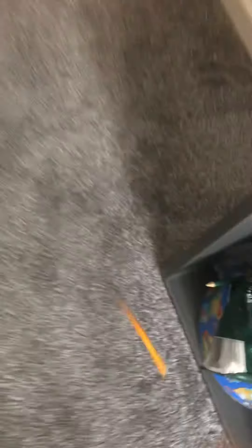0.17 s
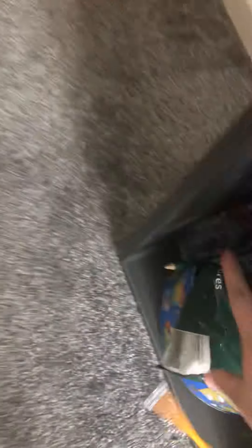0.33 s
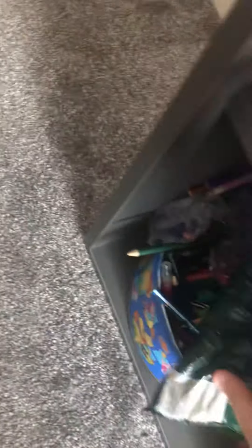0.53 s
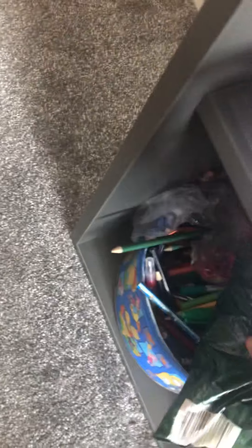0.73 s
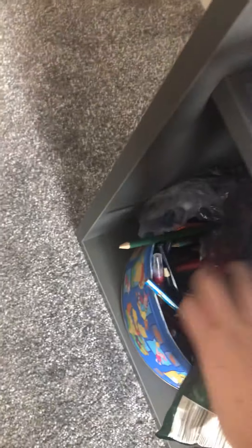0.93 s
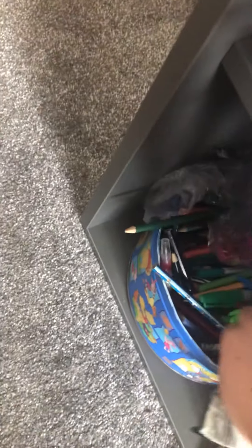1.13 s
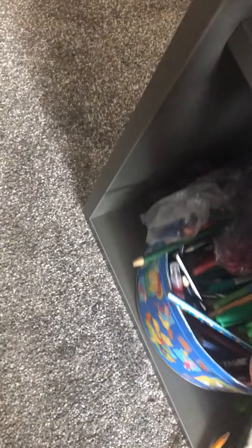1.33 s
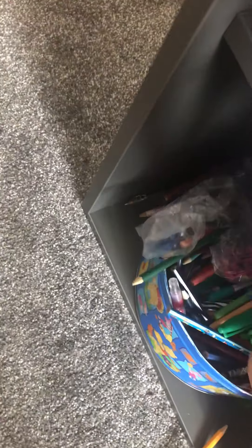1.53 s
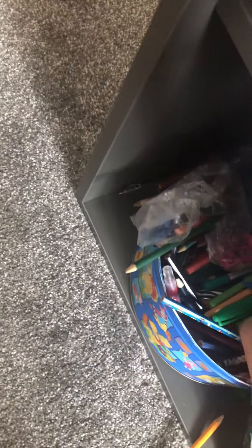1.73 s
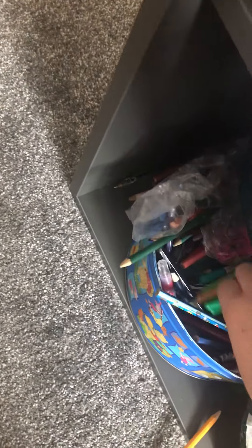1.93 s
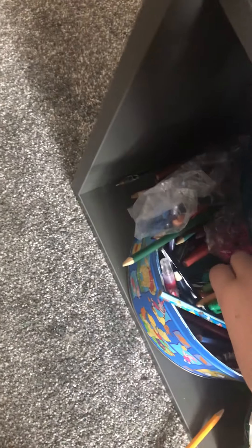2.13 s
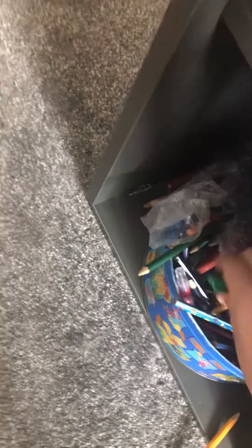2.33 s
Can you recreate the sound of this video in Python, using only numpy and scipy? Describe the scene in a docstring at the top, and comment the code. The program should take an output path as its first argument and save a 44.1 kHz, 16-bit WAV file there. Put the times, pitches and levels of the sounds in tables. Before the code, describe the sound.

Pens and pencils rattle sharply as a hand rummages through a tin inside a cabinet; a soft thud comes first, then loud clicks, taps and plastic bag rustle, thinning to faint ticks, close to a phone microphone.

```python
"""Sharp clicks of pens and pencils rummaged through by hand in a tin, inside an open cabinet, close to a phone.
Impacts excite decaying modes and noise bursts; taps are brief sines; a plastic bag rustles as gated noise.
Bumps ring the cabinet panels and the tin bottom, and a landing thuds on the carpeted floor.
Low rumbles and a faint room tone are shaped noise; the cabinet adds a short diffuse echo."""
import sys
import numpy as np
from scipy import signal
from scipy.fft import rfft, irfft, next_fast_len
from scipy.io import wavfile
from scipy.ndimage import map_coordinates

SR = 44100
rng = np.random.default_rng(int(sys.argv[2]) if len(sys.argv) > 2 else 0)


def store_pcm(level_fs):
    """Save levels as 16-bit WAV."""
    pcm = np.round(np.clip(level_fs, -1, 1) * 32767).astype(np.int16)
    wavfile.write(sys.argv[1], SR, np.atleast_2d(pcm).T)


def gain_from_db(level_db):
    """Turn a decibel level (scalar or array-like) into a linear amplitude factor."""
    decades = np.asarray(level_db, float) / 20
    return 10 ** decades


N = 109897  # samples


def unit(x):
    """Normalisation: scales a signal to rms 1."""
    return x / np.sqrt(np.mean(x ** 2) + 1e-20)


def along(points, hz):
    """Logarithmic pitch axis: reads (Hz, value) points between their frequencies."""
    point_hz, value = np.transpose(points)
    return np.interp(np.log(hz + 1), np.log(point_hz + 1), value)


def curves(rows):
    """Linear envelopes: one value per sample for each column after the time."""
    start_s, *columns = np.transpose(rows)
    return [np.interp(np.arange(N) / SR, start_s, column) for column in columns]


def wobble(rate):
    """Slow random modulation: a smooth curve through `rate` random knots a second."""
    knots = rng.standard_normal(int(N * rate / SR) + 4)
    return map_coordinates(knots, [np.arange(N) * rate / SR])


def coloured(x, points, tilt_db=0):
    """Linear filtering: x through a spectrum in dB, tilted by tilt_db per octave about 3 kHz."""
    size = next_fast_len(N + 8192)
    hz = np.fft.rfftfreq(size, 1 / SR)
    gain_db = along(points, hz) + tilt_db * np.log2((hz + 50) / 3000)
    return irfft(rfft(x, size) * gain_from_db(gain_db), size)[:N]


def bandpass(x, low_hz, high_hz, order=3):
    """Band limiting: a Butterworth filter passes low_hz to high_hz."""
    return signal.sosfilt(signal.butter(order, [low_hz, high_hz], "band", fs=SR, output="sos"), x)


def placed(times, shapes):
    """Superposition: the sum of one short shape per start time."""
    at = np.round(times * SR).astype(int)[:, None] + np.arange(shapes.shape[1])
    return np.bincount(at.ravel(), shapes.ravel(), N + SR)[:N]


def ringing(modes, level_db, attack_s, spread_db):
    """Modal decay: each blow is a row of dying sines, each mode randomly stronger or weaker."""
    t = np.arange(SR // 3) / SR
    draw = rng.standard_normal((len(level_db), len(modes)))
    ring = 0
    for k, (hz, mode_db, t60) in enumerate(modes):
        start_db = level_db[:, None] + mode_db + spread_db * draw[:, [k]]
        ring = ring + gain_from_db(start_db - 60 * t / t60) * np.sin(2 * np.pi * hz * t)
    return ring * (1 - np.exp(-t / attack_s))


RISE_S = 0.0006  # delay of each click after its start_s
DULL, MIDDLE, BRIGHT = (499, 3050, 0.055), (1910, 7180, 0.023), (7460, 15400, 0.016)  # low_hz, high_hz, t60_s
BAND_TRIM_DB = (2.5, -1.5, 5)  # dull, middle, bright
SNAP = 1.26  # contact spike, against noise of rms 1
CRACK_DB, CRACK_T60_S = 1, 0.0018  # fast decay added to each band's slow one
RING_DB, RING_T60_S = -5.5, 0.023
# Pen clicks: start_s, level_db, dull_db and bright_db (both relative to level_db), ring_hz
PEN_CLICKS = [(0.2408, -36, -11, -10, 2680), (0.288, -2.5, -16.5, -4.5, 1840), (0.3542, -22, -19, -8, 1900),
              (0.3655, -11, -5, -5.5, 4080), (0.374, -15.5, -15, -1, 4450), (0.3802, -20, -15, -2, 1840),
              (0.408, -22, -17, -13, 3480), (0.429, -17.5, -3.5, -7, 2730), (0.4385, -17, -7, -5.5, 2530),
              (0.4536, -23, -14, -4, 1840), (0.478, -21.5, -18, -1, 5700), (0.5427, -20.5, -4, -7, 1600),
              (0.5784, -21, -2, 2.5, 2770), (0.6519, -23, -20, 0, 4430), (0.6574, -10.5, -17, 2.5, 5810),
              (0.6676, -19, -3, -1, 8800), (0.6888, -14, -2.5, -24, 1880), (0.8088, -14.5, 2.5, -28, 4120),
              (0.842, -10.5, -9, -14, 4460), (0.8465, -23.5, 4, -26, 2800), (0.8686, -28.5, 6, -7, 1970),
              (0.889, -38.5, 5.5, 9.5, 11800), (0.9097, -22, 2, -9.5, 1900), (0.9515, -23, -3.5, -17, 1630),
              (1.0147, -13.5, -10, -2.5, 4000), (1.0181, -14.5, -11, -5, 5800),
              (1.0645, -20, -28, -10, 2260), (1.0969, -24, -4.5, -0.5, 5260), (1.1518, -27, -20, 0, 1630),
              (1.1865, -24.5, -10, -2, 3800), (1.2705, -31, -3, -2, 1530), (1.3274, -21.5, -16, -4, 7200),
              (1.3366, -22.5, -11, -2, 9500), (1.3524, -9.5, -16.5, -10, 4450), (1.3653, -25, -5, 6, 11400),
              (1.3795, -16.5, -27, 10.5, 11700), (1.388, -27, -5.5, -1, 11800),
              (1.4015, -17.5, -23, 5.5, 11200), (1.4074, -9.5, -26, 5, 11900),
              (1.4102, -9, -16.5, -3, 7760), (1.4136, -14, -15.5, -20, 7990), (1.425, -13, -25, -12, 4030),
              (1.4357, -22, -16, -12, 4350), (1.442, -18.5, -29, 5, 11600), (1.4519, -22, -23, 1.5, 11400),
              (1.4563, -15.5, -11, -5, 4100), (1.459, -15.5, -37, 0.5, 4430), (1.487, -34, -16, 9, 11400),
              (1.5, -29, -22, -1, 6150), (1.5067, -19.5, -30, -17, 4230), (1.511, -15.5, -19, -1, 3560),
              (1.5318, -41, -10, 9, 7900), (1.538, -16.5, -21, -0.5, 7900),
              (1.5518, -14.5, -15.5, -8, 2550), (1.5573, -14, -14.5, -13, 3440),
              (1.565, -25, -18, -8, 4900), (1.6116, -23, -34, -2, 4560), (1.6159, -15.5, -16.5, -9, 3530),
              (1.6454, -18.5, -14, -10.5, 3970), (1.6482, -23, -11, -21, 3083), (1.723, -35, -13, -2, 9400),
              (1.7345, -34, -9, -9, 2150), (1.7626, -35, -1.5, -11, 1550), (1.7748, -39, -15, -2, 7200),
              (1.7837, -32, -12, -9, 4060), (1.8078, -28.5, -13.5, -9, 2080), (1.8475, -35, -5, -25, 2430),
              (1.8878, -38, -2.5, -10, 2110), (1.9055, -30, -10.5, -13, 3970), (1.9275, -37, -7, -9, 3050),
              (1.9578, -28.5, -11, -8, 6000), (1.9947, -38, -3, -6, 1530), (2.0376, -36, -3.5, -22, 1820),
              (2.102, -37.5, -4, -7, 3550), (2.1862, -35.5, -3, -7, 2780), (2.1936, -28.5, -7, -0.5, 8300),
              (2.2076, -32.5, -8, -3, 5440), (2.2252, -28, -13, -12, 2130), (2.271, -31, -6, -10, 5950),
              (2.3, -34, -21, -5, 4510), (2.3123, -26, -21, -3.5, 1590), (2.3644, -35, -1, -1, 1840),
              (2.4318, -24.5, -9.5, -13, 4570), (2.4378, -33, -10, -8, 5900),
              (2.4577, -14.5, -14, -8.5, 3320), (2.4633, -21.5, -6, -21, 3750)]


def clicks():
    """Impact excitation: a spike and noise die faster in higher bands while the struck pen rings on one mode."""
    start_s, level_db, dull_db, bright_db, ring_hz = np.transpose(PEN_CLICKS)
    t = np.arange(SR // 16) / SR
    noise = rng.standard_normal((len(start_s), 3, len(t)))
    noise[:, :, 0] = SNAP
    out = 0
    for k, (band, band_db) in enumerate(zip((DULL, MIDDLE, BRIGHT), (dull_db, 0 * level_db, bright_db))):
        low_hz, high_hz, t60 = band
        fall = gain_from_db(-60 * t / t60) + gain_from_db(CRACK_DB - 60 * t / CRACK_T60_S)
        burst = bandpass(noise[:, k] * fall, low_hz, high_hz)
        burst /= np.abs(burst).max(1, keepdims=True)
        out = out + burst * gain_from_db(level_db + band_db + BAND_TRIM_DB[k])[:, None]
    # the ring follows the level of the band it lies in
    own_band_db = np.where(ring_hz > BRIGHT[0], bright_db, np.where(ring_hz < DULL[1], dull_db, 0))
    ring_db = level_db + RING_DB + own_band_db
    ring = gain_from_db(ring_db[:, None] - 60 * t / RING_T60_S) * np.sin(2 * np.pi * ring_hz[:, None] * t)
    return placed(start_s + RISE_S, out + ring)


METAL_DB = -7.5  # relative to the bright part of the click
METAL_FROM_S, METAL_TO_S = 1.37, 1.56
# Modes of the metal pen: mode_hz, level_db, t60_s
METAL_PEN_MODES = [(4200, -13, 0.032), (8050, -1.5, 0.023), (11400, 8, 0.011), (13900, 7, 0.011)]


def metal_pen():
    """Modal excitation: bright clicks within one span of time also ring all modes of a metal pen."""
    start_s, level_db, _, bright_db, ring_hz = np.transpose(PEN_CLICKS)
    start_s = start_s + RISE_S
    metal = (ring_hz > BRIGHT[0]) & (start_s > METAL_FROM_S) & (start_s < METAL_TO_S)
    blow_db = (level_db + bright_db)[metal] + METAL_DB
    return placed(start_s[metal], ringing(METAL_PEN_MODES, blow_db, attack_s=0.0003, spread_db=2))


PENCIL_S, PENCIL_DB = 0.2884, -13.5
# Modes of the pencil: mode_hz, level_db, t60_s
PENCIL_MODES = [(3600, -3, .03), (4080, -1, .024), (4300, -4, .024), (5770, -4, .034), (6080, -4, .02),
                (9730, -4, .022)]


def pencil():
    """Free vibration: a pencil landing in the tin rings on closely spaced modes."""
    ring = ringing(PENCIL_MODES, np.array([PENCIL_DB]), attack_s=0.00019, spread_db=4.0)
    return placed(np.array([PENCIL_S]), ring)


# Short dead taps of a pen end or finger on the tin: start_s, level_db, pitch_hz, t60_s
TIN_TAPS = [(.4392, -7.5, 600, 0.013), (.4483, -8.5, 204, 0.016), (.6897, -5.5, 690, 0.01),
            (.7665, -28, 4530, 0.028), (.8055, -21.5, 687, 0.044), (.8092, -9.5, 2477, 0.0093),
            (1.3524, -14.5, 2080, 0.014), (1.4253, -14.5, 2700, 0.013), (1.437, -32, 2306, .06),
            (2.459, -29.5, 956, 0.024)]


def taps():
    """Heavy damping: each tap is one pitch that dies within a fraction of a second."""
    start_s, level_db, pitch_hz, t60 = np.transpose(TIN_TAPS)[:, :, None]
    t = np.arange(SR // 16) / SR
    attack = 1 - np.exp(-2 * t * pitch_hz)
    tap = -gain_from_db(level_db - 60 * t / t60) * np.sin(2 * np.pi * pitch_hz * t) * attack
    return placed(start_s[:, 0], tap)


SIZE_CAP = 0.05  # chance below which crinkles and ticks grow no larger
CRINKLES_PER_S, CRINKLE_SPREAD_DB, CRINKLE_T60_S = 500, 5, 0.0092
HISS_SHARE = 0.44  # steady part of the gate


def crinkled():
    """Amplitude modulation: noise gated by tiny random crinkles over a sliding hiss."""
    row = rng.random((int(CRINKLES_PER_S * N / SR), 2))
    t = np.arange(SR // 80) / SR
    size_db = -CRINKLE_SPREAD_DB * np.log(np.maximum(row[:, 1:], SIZE_CAP))
    gate = unit(placed(row[:, 0] * N / SR, gain_from_db(size_db - 60 * t / CRINKLE_T60_S)))
    gate = gate * (1 - HISS_SHARE) + HISS_SHARE
    return gate * rng.standard_normal(N) * gain_from_db(1.08 * wobble(30.12))


TICKS_PER_S, TICK_SPREAD_DB = 280, 1
TICK_HZ, TICK_OCTAVES = 4510, 1.163  # median pitch and its spread
TICK_T60_CYCLES = 44  # at the median pitch


def ticks():
    """Random superposition: many small pen contacts, each a short ring of its own pitch."""
    count = int(TICKS_PER_S * N / SR)
    row, z = rng.random((count, 2)), rng.standard_normal((count, 1))
    hz = np.clip(TICK_HZ * 2 ** (TICK_OCTAVES * z), 1600, 15000)
    t = np.arange(SR // 100) / SR
    size_db = -TICK_SPREAD_DB * np.log(np.maximum(row[:, 1:], SIZE_CAP))
    fall_db = 60 * t * np.sqrt(hz * TICK_HZ) / TICK_T60_CYCLES
    return unit(placed(row[:, 0] * N / SR, gain_from_db(size_db - fall_db) * np.sin(2 * np.pi * hz * t)))


TICK_DB = -6  # relative to the bright crinkles
# Spectrum of the crinkles before tilting: hz, level_db (per Hz)
CRINKLE_COLOUR = [(180, -32), (300, -15.5), (537, -6.5), (656, -10.5), (1210, -0.5), (1480, -4), (5340, -6),
                  (11700, -17), (16000, -15)]
# Bag and sliding pens: start_s, level_db, brightness_db_per_octave (held within -4, all dull, to 3, all bright)
RUSTLE_COURSE = [(0, -60, -3.5), (.1, -60, -6), (.28, -59, -4.5), (.3, -46.5, 5), (.37, -27, -2),
                 (.42, -36.5, 3), (.46, -33, -1), (.54, -28.5, 0.5), (.7, -30, 1), (.74, -36.5, 0.5),
                 (.8, -38.5, -1.5), (.86, -37, -3.5), (.9, -46.5, -2), (.97, -34, -4), (1.02, -32.5, 2.5),
                 (1.12, -34, 0.5), (1.22, -36.5, -2), (1.31, -41.5, -0.5), (1.37, -39, 2.5), (1.46, -32, 2),
                 (1.48, -44, -3.5), (1.57, -43.5, 4), (1.6, -46.5, -1.5), (1.69, -53, -4), (1.74, -51, -3),
                 (1.8, -49.5, 4), (1.83, -54.5, -3.5), (1.95, -59.5, 3.5), (2, -51, -3), (2.08, -65, 4),
                 (2.12, -48.5, -4), (2.2, -49.5, -2.5), (2.35, -43.5, 0), (2.42, -51.5, 1),
                 (2.49, -49, -3.5)]


def rustle():
    """Power-preserving crossfade: dull and bright crinkles mixed by brightness, ticks riding on the bright."""
    level_db, brightness = curves(RUSTLE_COURSE)
    share = np.clip((brightness + 4) / 7, 0, 1)
    dull = unit(coloured(crinkled(), CRINKLE_COLOUR, tilt_db=-4))
    bright = unit(coloured(crinkled(), CRINKLE_COLOUR, tilt_db=3))
    bright = bright + gain_from_db(TICK_DB) * ticks()
    return gain_from_db(level_db) * (dull * np.sqrt(1 - share) + bright * np.sqrt(share))


BUMP_ATTACK_S, BOOM_DB, KNOCK_DB = 0.0019, 1, -7.5
BUMP_FAVOUR_DB = 17  # panel loss per octave away from the bump's pitch
# Modes of the cabinet panels: mode_hz, level_db, t60_s
PANEL_MODES = [(141, 0, 0.17), (222, 3, 0.13), (336, -2.5, 0.11)]
# Modes of the tin bottom: mode_hz, level_db, t60_s
TIN_MODES = [(455, -10, 0.04), (560, 0.5, 0.061), (723, -18.5, 0.042), (890, 1.5, 0.054)]
# Bumps on the cabinet: start_s, level_db, knock_db (tin bottom, relative), pitch_hz (panel favoured)
CABINET_BUMPS = [(0.288, -35, -24, 151), (0.36, -34, -4, 200), (0.548, -26, -4, 224), (0.6, -40.5, 5, 148),
                 (0.64, -33.5, 5, 200), (0.692, -30.5, 14, 224), (0.805, -33, 13.5, 232),
                 (0.851, -30.5, 2, 228), (0.903, -49.5, 24, 223), (0.958, -45.5, 7, 240),
                 (1.008, -38, -3, 210), (1.056, -35.5, 11, 160), (1.216, -44.5, 8, 215),
                 (1.321, -41, 7.5, 211), (1.409, -34, -10.5, 222), (1.448, -37, -14, 223),
                 (1.758, -44.5, -11, 153), (1.902, -45, 2, 204), (2.189, -44.5, 11.5, 197),
                 (2.458, -34.5, -9, 350)]


def bumps():
    """Selective excitation: soft contacts ring the tin bottom and, most, the panel nearest their pitch."""
    start_s, level_db, knock_db, pitch_hz = np.transpose(CABINET_BUMPS)
    t = np.arange(SR // 4) / SR
    draw = rng.standard_normal((len(start_s), len(PANEL_MODES) + len(TIN_MODES), 2))
    out = 0
    for k, (hz, mode_db, t60) in enumerate(PANEL_MODES + TIN_MODES):
        boom_db = BOOM_DB - BUMP_FAVOUR_DB * np.abs(np.log2(pitch_hz / hz))
        part_db = boom_db if k < len(PANEL_MODES) else KNOCK_DB + knock_db
        size_db = level_db + mode_db + 0.64 * draw[:, k, 0] + part_db
        mode_hz = hz * (1 + 0.022 * draw[:, k, 1])
        ring = gain_from_db(size_db[:, None] - 60 * t / t60) * np.sin(2 * np.pi * mode_hz[:, None] * t)
        out = out + (-1) ** k * ring  # neighbouring modes start in opposite phase
    return placed(start_s, out * (1 - np.exp(-t / BUMP_ATTACK_S)))


THUD_S, THUD_DB = 0.0765, -23.5
PUFF_DB, PUFF_T60_S = -34, 0.07  # broad low noise of the landing
ECHO_DB, ECHO_T60_S = -49.5, 0.49  # its airy echo from the room
# Modes of the floor: mode_hz, level_db, t60_s
FLOOR_MODES = [(69, -14, 0.44), (141, 0.5, .18), (163, -5, 0.27), (218.5, -0.5, 0.22), (312, 2.5, 0.16),
               (350, 3.5, 0.095), (451, -6, 0.13), (619, -7, 0.069), (740, -10, 0.065), (1194, -23, 0.014)]


def thud():
    """Damped impact: a knee or hand on the carpeted floor gives modes, a noise puff and a swelling echo."""
    t = np.arange(SR // 3) / SR
    puff = unit(bandpass(rng.standard_normal(len(t)), 150, 900))
    puff = gain_from_db(PUFF_DB - 60 * t / PUFF_T60_S) * puff
    echo = unit(bandpass(rng.standard_normal(len(t)), 400, 4000, order=1))
    echo = gain_from_db(ECHO_DB - 60 * t / ECHO_T60_S) * np.sqrt(20 * t) * echo
    ring = ringing(FLOOR_MODES, np.array([THUD_DB]), attack_s=0.002, spread_db=0.5)
    return placed(np.array([THUD_S]), ring + puff + echo)


# Rumble of the moved tin: start_s, level_db
HANDLING_COURSE = [(0, -67), (.27, -55), (.37, -39.5), (.68, -35.5), (.8, -52), (1.1, -42.5), (1.45, -51),
                   (1.65, -57.5), (1.8, -56.5), (2.08, -59.5), (2.25, -53.5), (2.49, -55.5)]
# Its spectrum: hz, level_db (per Hz)
HANDLING_SPECTRUM = [(50, -47), (85, -9.5), (150, -1), (215, -3), (320, -12.5), (500, -20.5), (700, -51.5)]


def handling():
    """Modulated noise: the moved tin gives a low, lumpy rumble."""
    (level_db,) = curves(HANDLING_COURSE)
    rumble = coloured(rng.standard_normal(N), HANDLING_SPECTRUM)
    return gain_from_db(level_db) * unit(gain_from_db(1.8 * wobble(11)) * rumble)


# Body weight shifting on the floor: start_s, level_db
FLOOR_COURSE = [(0, -47.5), (.15, -58), (.25, -78), (.38, -47), (.46, -71), (.6, -45.5), (.8, -66),
                (1.15, -58), (1.5, -70), (2.49, -57.5)]
# Its spectrum: hz, level_db (per Hz)
FLOOR_SPECTRUM = [(25, -47), (40, 5), (55, -1), (85, 13.5), (120, -40.5)]


def floor_rumble():
    """Low-frequency noise: body weight shifting on the floor gives a deep rumble."""
    (level_db,) = curves(FLOOR_COURSE)
    return gain_from_db(level_db) * unit(coloured(rng.standard_normal(N), FLOOR_SPECTRUM))


CABINET_DB = -14.5  # echo against the direct sound
# Decay of the cabinet's echo: hz, t60_s
CABINET_DECAY = [(200, 0.19), (2000, 0.17), (10000, 0.058)]


def cabinet(x):
    """Diffuse reverberation: noise tails die at each frequency's own rate, a new tail every tenth of a second."""
    out, step = np.zeros(N + SR), SR // 10
    for a in range(0, N, step):
        hz, t, z = signal.stft(rng.standard_normal(SR // 4), SR, nperseg=256)
        fall = gain_from_db(-60 * t / along(CABINET_DECAY, hz)[:, None])
        tail = signal.istft(z * fall, SR, nperseg=256)[1]
        wet = signal.fftconvolve(x[a:a + step], tail / np.linalg.norm(tail))
        out[a + 100:a + 100 + len(wet)] += wet  # echo starts 100 samples late
    return out[:N]


AIR_DB = -62
# Spectrum of the room tone: hz, level_db (per Hz)
AIR_SPECTRUM = [(150, -37), (250, 11), (1500, -16), (6500, -26), (7800, -37), (16000, -41)]


def air():
    """Stationary noise: a faint steady room tone."""
    return gain_from_db(AIR_DB) * unit(coloured(rng.standard_normal(N), AIR_SPECTRUM))


def scene():
    """Superposition of all sources; pens, taps and rustle also excite the cabinet's echo."""
    pens = clicks() + metal_pen() + pencil() + taps() + rustle()
    echo = gain_from_db(CABINET_DB) * cabinet(pens)
    return (pens + echo + bumps() + thud() + handling() + floor_rumble() + air())[None]


def low_pass(x):
    """Removes everything above the highest recorded frequency."""
    return signal.sosfilt(signal.butter(12, 17020, fs=SR, output="sos"), x)


TOP = 0.96  # amplitude the soft overload approaches
# Microphone response: hz, level_db
MIC_RESPONSE = [(22, -38), (42, -2.5), (9500, 0), (10500, -3.5), (11300, -1), (15700, -6), (16100, -36),
                (16900, -36), (17100, -87)]


def record(dry):
    """Saturation, then linear filtering: soft overload and the phone's microphone colour."""
    limited = dry[0] / (1 + np.abs(dry[0] / TOP) ** 4) ** 0.25
    mix = coloured(limited, MIC_RESPONSE)[None]
    return low_pass(mix)


dry = scene()
out = record(dry)
store_pcm(out)
```